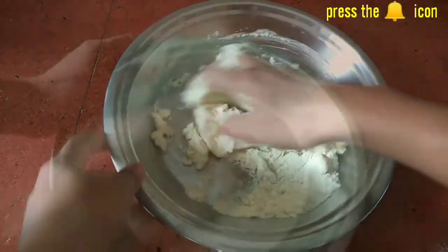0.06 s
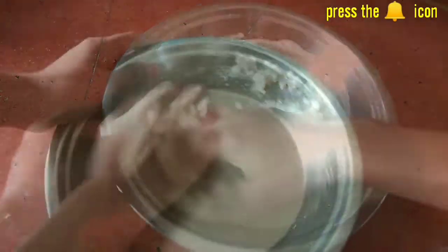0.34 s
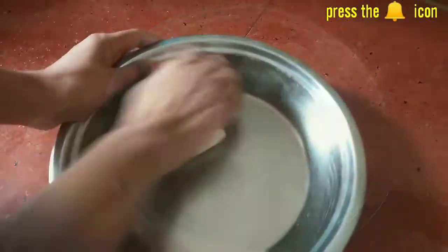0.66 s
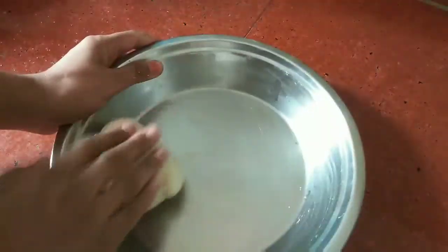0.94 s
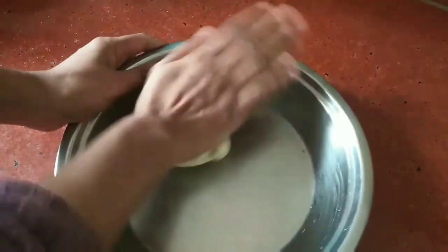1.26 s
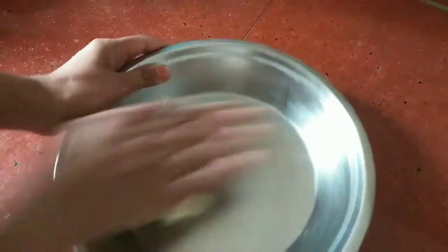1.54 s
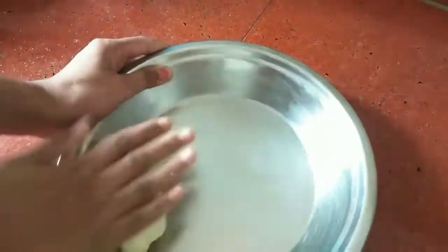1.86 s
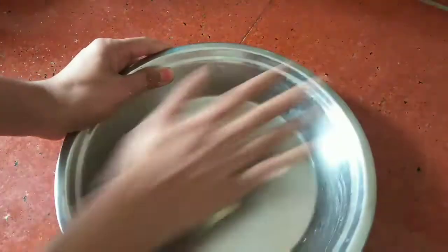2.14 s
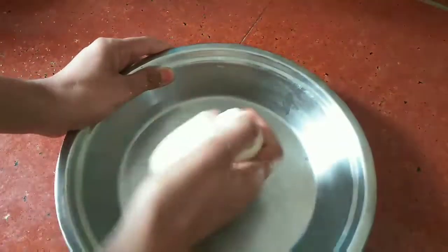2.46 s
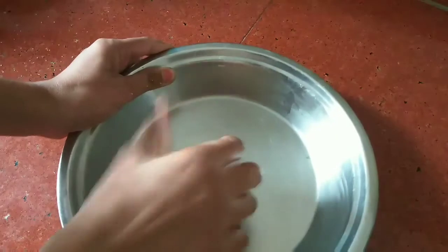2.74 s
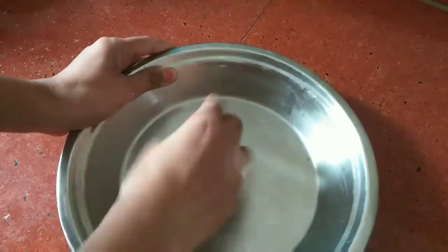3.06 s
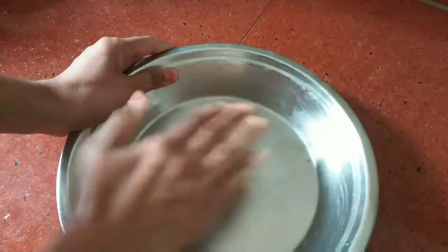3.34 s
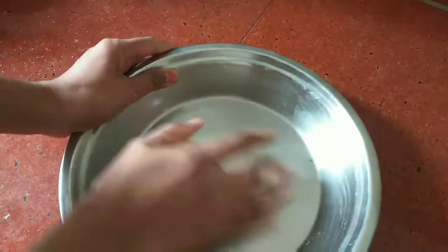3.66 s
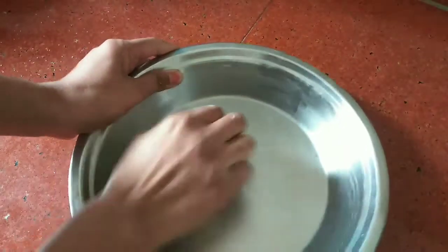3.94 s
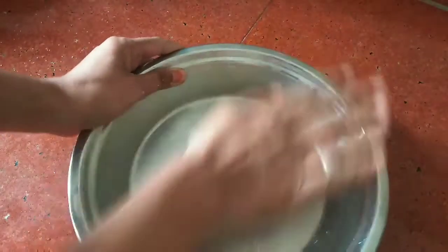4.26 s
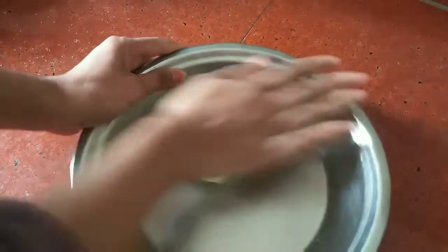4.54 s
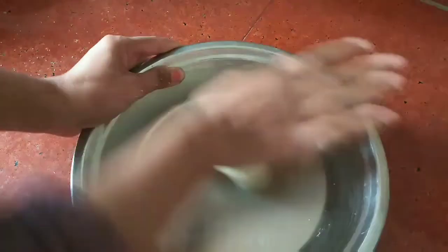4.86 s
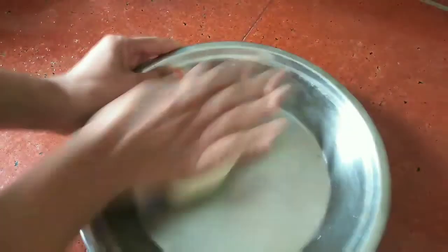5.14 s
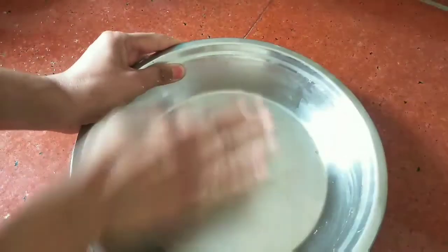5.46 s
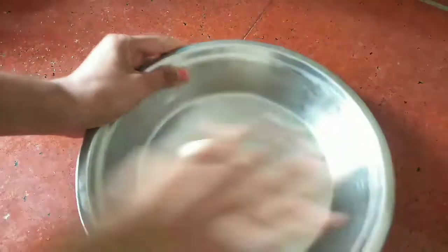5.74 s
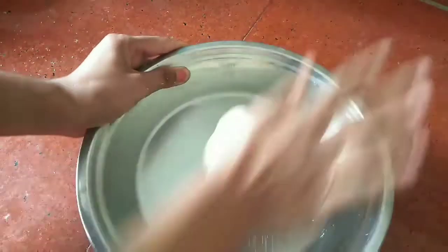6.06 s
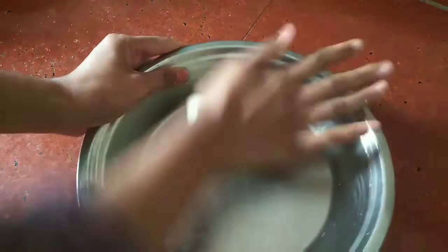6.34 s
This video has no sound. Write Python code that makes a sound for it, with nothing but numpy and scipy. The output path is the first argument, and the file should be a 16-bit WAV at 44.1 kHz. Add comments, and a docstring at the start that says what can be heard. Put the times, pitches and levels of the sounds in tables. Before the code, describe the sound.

Hands push and roll stiff dough around a wide steel bowl on a hard kitchen floor. Soft, uneven thumps and knocks mix with raspy rubbing and tiny sticky snaps, and the held bowl rings briefly on the sharper hits. A faint high squeal sounds early and again near the end. The knocks thin out in the second half while the rubbing strokes continue, heard close in a small bare room with a low hum.

```python
"""Hands push and roll stiff dough around a wide steel bowl on a hard kitchen floor.
The palm thumps and flexes the base, which knocks on the floor. Dough and skin stick and slip over the
metal: rubbing, grit, chirps, tacks. The held bowl rings briefly and a small bare room answers.
A faint high squeal sounds twice; room air and a low hum lie underneath. The level dips once, early on."""
import sys
import numpy as np
from scipy import signal
from scipy.fft import rfft, irfft, next_fast_len
from scipy.io import wavfile
from scipy.ndimage import uniform_filter1d

SR = 44100
rng = np.random.default_rng(int(sys.argv[2]) if len(sys.argv) > 2 else 0)


def file_out(sig):
    """Save sig as 16-bit WAV at sys.argv[1]."""
    # one column per channel
    cols = np.atleast_2d(sig).T
    # limit, then scale
    lim = np.clip(cols, -1, 1)
    pcm = np.round(lim * 32767).astype(np.int16)
    wavfile.write(sys.argv[1], SR, pcm)


N = 281799
TIME_S = np.arange(N) / SR
RING_SAMPLES = 2 ** 15

# blows: t/s, level/dB, arm weight/dB, sharpness/dB, L-R/dB, crush length/ms, lead-in/dB,
# note of the struck patch f/Hz, note re blow/dB, note decay/ms
BLOWS = [(0.397, -52, -17, -15, -0.5, 2, -5.5, 593, 15.5, 1.54),
         (1.166, -51, -12, 2, 0, 5.8, -7, 520, -10, 4.2), (1.182, -54, -10.5, -13, 2, 8.4, -8, 382, 2, 9),
         (1.451, -58, -1, 4, 0.5, 5.2, -1.5, 1217, 18.5, 2.1),
         (1.495, -60, -13, 1, 2, 4.2, 5, 2150, 21, 1.25),
         (1.724, -43, 2, -11, 0, 3.8, -10.5, 264.3, 15.5, 10.4),
         (1.862, -66, -9, -3, -2, 10, 1, 344, 7, 13), (1.98, -62, -1.5, -17, 0, 7, -7, 474, 5, 13),
         (2.114, -60, -31, 3, -4, 3.7, -6, 1870, 9, 4), (2.356, -55, -6.5, 2, 0.5, 4.7, 0, 670, 10.5, 1.8),
         (2.392, -63.5, -12, -14, 0, 3.2, -6, 504, 2, 9.5), (2.452, -65, -25, -2, -1, 3, -5, 830, 4, 6.6),
         (2.605, -38, -16.5, -3, -1.5, 3.5, -11, 1193, 10, 4.4),
         (2.644, -47, -18, -1, -6, 6.7, -9, 303, 4, 8.1), (2.654, -43.5, -18, 7, 1, 3.6, 3, 1315, 2, 12.6),
         (2.676, -48.5, -2.5, -18.5, 0.5, 8.3, -30, 400, 19.5, 2.6),
         (2.709, -49.5, -11.5, -9, 4, 8.1, -7, 292, -2, 5.4), (3.086, -48, -5, -8, -1, 11, -6, 199, 4, 13),
         (3.19, -42, -8, -4, -2, 4.1, -8, 232, -8, 6),
         (3.711, -69, -22.5, 4.5, -2.5, 2.1, -11, 1360, 2.5, 8.3),
         (3.799, -67.5, -8, 3.5, -1, 5, -18, 2030, 11.5, 5),
         (3.842, -47, -30, -3, -0.5, 5.5, -9, 2380, 7, 2.8),
         (3.98, -51, -16.5, -3.5, -1, 12.6, -7, 1182, -2, 18),
         (4.061, -58, -12.5, 4.5, 0.5, 3.3, -5, 2156, 11, 4),
         (4.436, -68, -18, -6, 3, 4, -11, 2290, 7.5, 5.5), (4.485, -72, -13, -5, -3, 5, -6, 470, 9, 8.8),
         (4.555, -64.5, -25, 4, 3, 9.8, -1, 1170, -5, 11), (4.902, -64, -11, 7, 1, 6, 0, 1286, 8, 8.8),
         (5.259, -70, -18, -1, -4, 5, -11, 607, 9.5, 7), (5.324, -70, -23, 15, 5, 4, 7, 3610, 14.5, 6.9),
         (6.306, -66.5, -2, -12, 1, 5.4, -6, 490, 0, 11)]
# boom, thud, body, clank, tick: level/dB, share of weight, share of sharpness
BLOW_BANDS = [(-6, 1.15, 0.64), (-2.5, 0.71, -0.16), (-6, 0.22, -0.45), (-2.4, -0.0098, 0.13),
              (-4.5, 0.13, 0.96)]
BLOW_EDGES_HZ = (105, 180, 460, 900, 2800, 13000)
# contact spectrum: f/Hz, level/dB
CONTACT_EQ = [(60, -6), (140, -13.5), (200, 3.5), (262, 4), (350, 5.5), (620, -2), (850, -2.5), (1230, 2.5),
              (1580, -5.5), (2150, -4.5), (3500, -5), (5800, -3), (8000, -19), (12500, -18)]
# bowl modes: f/Hz, level/dB, T60/s
BOWL_MODES = [(139.8, -5, 0.24), (163.8, -8.5, 0.33), (230.5, -5, 0.45), (267, -5.5, 0.37),
              (339, -2.5, 0.48), (388, -11, 0.49), (447, -14.5, 0.47), (539, -4, 0.52), (609, -2, 0.52),
              (713, -4.5, 0.41), (784, -6, 0.46), (960, -1, 0.52), (1138, -1, 0.26), (1200, -0.5, 0.095),
              (1244, 0, 0.14), (1305, -2.5, 0.22), (1368, -0.5, 0.39), (1686, 2, 0.2), (1790, 2, 0.4),
              (1860, -0.5, 0.2), (2049, -1, 0.2), (2410, -1.5, 0.25), (3090, -6, 0.24), (4190, 7.5, 0.22),
              (4410, 1.5, 0.21), (5120, 3, 0.19)]
# base bulges under the palm: t/s, favoured f/Hz, level/dB, time until damped/s
BULGES = [(0.401, 455, -56.5, 0.16), (1.175, 133, -53, 0.053), (1.49, 200, -60, 0.034),
          (1.723, 140, -34.5, 0.064), (1.726, 490, -41.5, 0.042), (1.821, 145, -39, 0.12),
          (1.916, 267, -50, 0.078), (2.70, 348, -54, 0.095), (3.09, 171, -54.5, 0.093),
          (3.235, 346, -53.5, 0.16), (3.842, 191, -54, 0.037)]
# air puffs: t/s, level/dB, half length/s
PUFFS = [(1.79, -65, .018), (1.828, -55, 0.011), (2.667, -61, 0.0079)]
# wall clang modes: f/Hz, level/dB, T60/s
CLANG_MODES = [(1840, -2, 0.043), (1965, -3, 0.045), (2064, -4, 0.059), (2360, 1, 0.027), (2960, -8, 0.034)]
# knocks that clang: t/s, level/dB
CLANG_JOLTS = [(2.606, -31), (3.191, -42.5)]
# close, beating rim modes: f/Hz, level/dB, T60/s
RIM_MODES = [(2900, -2.5, 0.69), (3360, -2, 0.58), (3440, -2.5, 0.75), (3460, -2, 0.44), (4140, -8, 0.67),
             (4250, -6.5, 0.97), (4190, -2, 0.8), (5440, 1, 0.42), (5599, -6, 0.4), (6460, -3, .35)]
# jolts that ring the rim: t/s, level/dB
RIM_JOLTS = [(2.656, -51.5), (4.064, -70.5), (5.325, -69)]

# strokes: crest t/s, length/s, level/dB, skin dryness/dB, dough stickiness/dB
STROKES = [(0.01, 0.24, -74.5, 11.5, 8), (0.348, 0.21, -80, 24, 9), (1.176, 0.091, -58.5, 2.5, -4),
           (1.37, 1, -75.5, 17, 6.5), (1.719, 0.085, -48.5, -1.5, -4), (1.895, 0.11, -54.5, -4, -5.5),
           (2.024, 0.083, -55, 6.5, -6), (2.124, 0.077, -53.5, -3.5, -2.5), (2.15, 0.027, -59, 6, 6.5),
           (2.247, 0.038, -59, -6, -4), (2.295, 0.062, -57, -1.5, -3), (2.429, 0.086, -62.5, -5.5, -17),
           (2.582, 0.064, -64, 8.5, -10), (2.705, 0.15, -58, 1, -7), (2.852, 0.12, -62, -2.5, -12),
           (3.256, .12, -64, -16, -11), (3.433, 0.076, -69.5, 5.5, 7), (3.601, 0.079, -72, 0, 3.5),
           (3.819, 0.045, -63.5, 4, 3.5), (3.975, 0.1, -61.5, -1, 1), (4.102, 0.083, -65.5, -3, 1),
           (4.33, 0.036, -68.5, 7, 5), (4.426, 0.075, -62.5, -1.5, -10), (4.603, 0.13, -65.5, 3, 3.5),
           (4.78, 0.12, -62.5, 4, -8), (4.906, 0.063, -58, -2.5, 2.5), (4.998, .16, -59.5, 11, -5),
           (5.137, 0.067, -62.5, -4, -4), (5.258, 0.077, -59, -1.5, 0), (5.32, 0.046, -63, 0, 3.5),
           (5.47, 0.089, -63, -1.5, -5), (5.649, 0.11, -62, -1, -0.5), (5.784, 0.04, -68.5, -3, -10),
           (5.87, 0.093, -61.5, 3.5, -2.5), (5.98, .1, -58.5, -2, 3.5), (6.217, 0.15, -62.5, -6.5, -8),
           (6.355, 0.23, -62.5, 0, -1)]
# drag, scrape, hiss, crackle: level/dB, share of dryness, share of stickiness
STROKE_BANDS = [(-11.5, -0.033, 0), (-4, -0.7, 0), (-4, 0.43, 0), (-7.5, 0.032, 0.99)]
STROKE_EDGES_HZ = (220, 900, 2500, 7000, 13000)
# light rubbing between strokes: t/s, level/dB
TOUCH = [(0, -90), (.85, -79), (.88, -76), (2.3, -68), (3.0, -99), (3.85, -94), (4.2, -71), (6.39, -72)]
# sliding contact spectrum: f/Hz, level/dB
RUB_EQ = [(200, -11), (450, -7), (800, -3), (1020, -3.5), (1290, -2.5), (1530, -8), (2050, -2.5),
          (2900, -4), (4400, -2), (6300, -6), (8000, -20), (13000, -13)]
# rubbed wall resonances: f/Hz, width/Hz, level re plain rubbing/dB
WALL_PEAKS = [(1203, 64, 2), (1326, 60, 6), (1660, 70, -4.5), (2064, 64, -6.5), (2650, 27, -8.5),
              (3200, 150, -13), (3610, 78, -6.5), (4500, 390, -6.5)]
# skin catching on steel, and sticky dough letting go with a tiny chirp: t/s, f/Hz, relative level/dB, half
# length/ms
CATCHES = [(1.137, 1380, -61, 7), (1.455, 4800, -59, 4.3), (1.475, 1330, -55, 3.9),
           (1.502, 1750, -53.5, 4.6), (1.986, 3950, -46, 1.9), (2.014, 4200, -46, 2.5),
           (2.09, 1150, -49.5, 2.7), (2.091, 5400, -58, 2), (2.117, 1335, -41.5, 3.4),
           (2.228, 1400, -60, 2), (2.257, 2100, -56, 4), (2.353, 2400, -45.5, 1.3), (2.358, 5650, -53, 1.3),
           (2.393, 1200, -48.5, 1.7), (3.421, 4600, -57.5, 7), (3.844, 3400, -46, 1.9),
           (3.918, 6500, -61.5, 4.4), (3.988, 4550, -53, 3), (4.066, 2170, -51, 3), (4.066, 3400, -48, 2.8),
           (4.32, 4870, -66, 4.4), (4.39, 3550, -67, 3.3), (4.559, 1730, -51.5, 3.2),
           (4.571, 900, -56.5, 4), (4.61, 1150, -56.5, 3.8), (4.76, 5600, -61, 4.4),
           (4.803, 4100, -67, 2.8), (4.811, 1300, -57, 6.9), (5.136, 3140, -60, 4.8),
           (5.246, 1180, -55.5, 7.7), (5.327, 3530, -52, 4), (5.326, 4410, -56, 6), (5.327, 2400, -59, 5.1),
           (5.476, 1200, -58.5, 5.4), (5.5, 3000, -64, 3), (5.622, 1120, -60, 6.6),
           (5.658, 1894, -56.5, 2.7), (5.69, 6700, -59, 4.1), (5.958, 1300, -56, 7), (6.19, 1200, -57, 4.6),
           (6.366, 1150, -58, 3.5)]
# dough letting go: t/s, level/dB
TACKS = [(1.169, -47), (2.359, -51), (3.844, -55), (4.063, -48), (4.068, -53), (5.325, -55)]
# the wall throws the treble left: f/Hz, L-R/dB
TREBLE_PAN = [(300, -2), (1200, -0.5), (2200, 1), (4000, -2), (7000, 6), (13000, 5)]

# squeal envelope: t/s, main tone/dB, lower tone/dB
SQUEAL_LEVELS = [(.89, -92, -97), (.96, -70, -73), (1.0, -59, -77), (1.04, -60.5, -77), (1.08, -72.5, -80),
                 (1.12, -68, -74), (1.22, -65, -76), (1.34, -66.5, -77), (1.42, -77, -91),
                 (1.48, -96, -100), (1.6, -120, -120), (5.15, -120, -120), (5.3, -75, -88),
                 (5.58, -76.5, -90), (5.72, -76, -95), (5.9, -110, -120)]
# squeal tones: f/Hz, fractional rise
SQUEAL_TONES = [(3680, 0.012), (3290, .002)]
# room decay: f/Hz, T60/s
ROOM_T60 = [(100, 0.9), (260, 0.49), (700, 0.62), (1800, 0.47), (4800, 0.35), (12000, 0.28)]
# diffuse field: f/Hz, L-R correlation
COHERENCE = [(60, 0.94), (140, 0.86), (280, 0.59), (550, 0.32), (1200, -0.14), (2500, -0.29),
             (12000, -0.078)]
# room air spectrum: f/Hz, relative level/dB
AIR_EQ = [(25, -32), (60, -19.5), (115, -14.5), (280, -17), (550, -17), (900, -22.5), (1300, -24.5),
          (1650, -23), (2200, -23.5), (6500, -30), (8000, -36), (13000, -32)]
# room hum: t/s, level/dB
HUM_LEVEL = [(0, -87), (.12, -69), (.22, -79), (.5, -85), (.89, -71.5), (3.6, -81), (6.39, -79)]
# overall gain on all layers, with one brief dip: t/s, gain/dB
MASTER_GAIN = [(.54, 3.5), (.62, -9), (.7, -18), (.858, -26), (.874, 6)]


def blows(crush_db=3, crackle_db=9, lead_in_s=0.0084, knock_db=7, knock_slope=0.17, medium_db=-46):
    """The blow lands and small contacts crush after it; weight and sharpness tilt the bands."""
    out = np.zeros((2, N + RING_SAMPLES))
    lead = int(.02 * SR)
    attack = slice(lead, lead + int(.03 * SR))
    t = TIME_S[:RING_SAMPLES] - lead / SR
    for at_s, level_db, weight_db, sharp_db, pan_db, crush_ms, lead_in_db, *_ in BLOWS:
        age = 2000 * np.maximum(t, 0) / crush_ms
        crackle = rng.standard_normal(RING_SAMPLES) * undb(crackle_db * rng.standard_normal(RING_SAMPLES))
        # a short noise swell just before the blow softens its attack
        lead_in = undb(lead_in_db) * unit(crackle * np.exp(-np.abs(t) / lead_in_s) * (t < 0))
        crush = undb(crush_db) * unit(crackle * age * np.exp(-age))
        drive = (crush + lead_in) / np.sqrt(RING_SAMPLES)
        drive[lead] += 1
        sound = convolve(drive, bowl_in_room(ring_db=-1, early_db=14, room_db=7, early_s=0.017))
        # base hits the floor 2 ms later, more sharply under a hard blow
        sound[:, lead + int(.002 * SR)] += undb(knock_db + knock_slope * (level_db - medium_db))
        sound = colour(sound, CONTACT_EQ)
        start = int(at_s * SR) - lead
        for lo_hz, hi_hz, (db, heavy, sharp) in zip(BLOW_EDGES_HZ, BLOW_EDGES_HZ[1:], BLOW_BANDS):
            part = band(sound, lo_hz, hi_hz)
            gain = undb(level_db + db + heavy * weight_db + sharp * sharp_db) / part[:, attack].std()
            out[:, start:start + RING_SAMPLES] += pan(pan_db) * gain * part
    return out[:, :N]


def patch_notes(rise_s=0.0015, delay_s=0.001003, sag=0.036):
    """The struck patch of steel gives a short sagging note, choked by the dough."""
    out, t = np.zeros((2, N + RING_SAMPLES)), TIME_S[:RING_SAMPLES]
    for at_s, level_db, _, _, pan_db, _, _, hz, note_db, decay_ms in BLOWS:
        fade = np.exp(-1000 * t / decay_ms)
        pitch_hz = hz * (1 + sag * (fade - .5))
        note = np.sqrt(2) * fade * (1 - np.exp(-t / rise_s)) * sine(pitch_hz)
        start = int((at_s + delay_s) * SR)
        out[:, start:start + RING_SAMPLES] += pan(pan_db) * undb(level_db + note_db) * note
    return convolve(out[:, :N], bowl_in_room(ring_db=-39, early_db=-7, room_db=-6))


def base_flex(push_s=0.01, damp_s=0.02, spread_oct=0.3, waver=0.026, mode_count=8):
    """The bulging base swings in the lowest modes, detuned and then stopped by the hand."""
    out, t = np.zeros(N + RING_SAMPLES), TIME_S[:RING_SAMPLES]
    hz, db, t60_s = np.transpose(BOWL_MODES[:mode_count])[:, :, None]
    tuning = 1 + waver * np.array([walk(70) for _ in hz])
    for at_s, favoured_hz, level_db, free_s in BULGES:
        start = int(at_s * SR)
        span = slice(start, start + RING_SAMPLES)
        sizes = undb(db) * np.exp(-(np.log2(hz / favoured_hz) / spread_oct) ** 2)
        modes = sizes * sine(hz * tuning[:, span]) * decay(t, t60_s)
        swing = np.sum(modes, axis=0) / np.linalg.norm(sizes)
        out[span] += undb(level_db) * swing * held(t, push_s, free_s, damp_s)
    return np.sqrt(2) * out[:N]


def puffs(band_hz=(68, 115)):
    """Low gusts of air squeezed from under bowl and dough."""
    air = band(diffuse(N), *band_hz)
    envelope = sum(undb(db) * np.exp(-((TIME_S - at_s) / half_s) ** 2) for at_s, db, half_s in PUFFS)
    return envelope * air / running_rms(air, 1024)


def steel_ring(modes, jolts, rise_s, free_s, damp_s=.03):
    """A jolt rings a group of modes until they fade or the hand stops them."""
    out, t = np.zeros((2, N + RING_SAMPLES)), TIME_S[:RING_SAMPLES]
    hz, db, t60_s = np.transpose(modes)[:, :, None, None]
    envelope = np.sqrt(2) * held(t, rise_s, free_s, damp_s) / np.linalg.norm(undb(db))
    for at_s, level_db in jolts:
        phase = 2 * np.pi * rng.random((len(modes), 2, 1))
        ring = np.sum(undb(db) * np.sin(2 * np.pi * hz * t + phase) * decay(t, t60_s), axis=0)
        start = int(at_s * SR)
        out[:, start:start + RING_SAMPLES] += undb(level_db) * envelope * ring
    return out[:, :N]


def rubbing():
    """Slips swell with each stroke; dryness and stickiness weight the bands."""
    sound, out = slips(), 0
    for lo_hz, hi_hz, (db, dry_share, sticky_share) in zip(
            STROKE_EDGES_HZ, STROKE_EDGES_HZ[1:], STROKE_BANDS):
        part = band(sound, lo_hz, hi_hz)
        out += undb(db) * effort(dry_share, sticky_share) * part / running_rms(part, 4096)
    return out


def effort(dry_share, sticky_share, touch_dry_db=-3, touch_sticky_db=4, rise_share=0.47):
    """Rubbing amplitude: each stroke swells and eases over the resting touch."""
    power = undb(curve(TOUCH)[0] + dry_share * touch_dry_db + sticky_share * touch_sticky_db) ** 2
    for at_s, length_s, db, dry_db, sticky_db in STROKES:
        near = slice(*np.searchsorted(TIME_S, [at_s - 2 * length_s, at_s + 2 * length_s]))
        t = TIME_S[near] - at_s
        width_s = length_s * np.where(t < 0, rise_share, 1 - rise_share)
        swell = np.exp(-(t / width_s) ** 2)
        power[near] += undb(db + dry_share * dry_db + sticky_share * sticky_db) ** 2 * swell
    return np.sqrt(power)


def slips(rate_hz=1100, scatter_db=3.5, judder_db=1, shift_db=6, places=6):
    """Dough sticks and slips in tiny grains; the hand drifts between places, each with its own ring."""
    weights = undb(shift_db * np.array([walk(14) for _ in range(places)]))
    weights /= np.sqrt(np.sum(weights ** 2, axis=0))
    judder, out = undb(judder_db * walk(50)), 0
    for weight in weights:
        sizes = undb(scatter_db * np.minimum(rng.exponential(size=N), 4))
        grains = (rng.random(N) < rate_hz / SR) * rng.standard_normal(N) * sizes
        place = bowl_in_room(ring_db=-10.5, early_db=11.5, room_db=3.5, early_s=0.013, place_db=5)
        out += convolve(grains * weight * judder, place)
    return wall_ring(mottle(colour(out, RUB_EQ)))


def mottle(x, depth_db=4.5, patch_s=.045, patch_hz=150, smooth_above_hz=5500):
    """Narrow bands swell and fade at random: a patchy metallic rasp, smoother on top."""
    size, hop = 1024, 256
    hz, _, spectra = signal.stft(x, fs=SR, nperseg=size, noverlap=size - hop)
    drift = rng.standard_normal(spectra.shape[1:])
    for axis, span in enumerate([patch_hz * size / SR, patch_s * SR / hop]):
        for _ in range(2):
            drift = uniform_filter1d(drift, int(span), axis=axis)
    gain_db = depth_db * unit(drift) / np.hypot(1, (hz[:, None] / smooth_above_hz) ** 2)
    return signal.istft(spectra * undb(gain_db), nperseg=size, noverlap=size - hop)[1][:, :N]


def wall_ring(x):
    """Sliding contact keeps the wall's narrow resonances sounding."""
    return x + sum(undb(db) * signal.lfilter(*signal.iirpeak(hz, hz / width_hz, fs=SR), x)
                   for hz, width_hz, db in WALL_PEAKS)


def grit(rate_hz=110, lo_hz=1600, hi_hz=6800, gain_db=-7.5, scatter_db=2, decay_s=0.00076):
    """Specks of dough tear loose at random, each with a tiny ring at its own pitch."""
    out, t = np.zeros(N + RING_SAMPLES), TIME_S[:1024]
    strength = effort(dry_share=0.15, sticky_share=0.13)
    envelope = np.e * t / decay_s * np.exp(-t / decay_s)
    for when, height, luck in rng.random((int(rate_hz * N / SR), 3)):
        start = int(when * N)
        size = strength[start] * undb(gain_db + scatter_db * min(-np.log(1 - luck), 3))
        hz = lo_hz * (hi_hz / lo_hz) ** height
        out[start:start + len(t)] += size * envelope * np.sin(2 * np.pi * hz * t)
    return wall_ring(convolve(out[:N], bowl_in_room(ring_db=-24, early_db=1.5, room_db=-4.5)))


def catches(gain_db=-8, waver=0.025, soft_hz=1260, spread_hz=64, soft_db=-9, soft_ms=6.4, jitter_s=0.0081):
    """Stick-slip chirps: sharp catches of skin and sticky dough letting go, plus a soft one near each stroke's
    crest."""
    chance = rng.standard_normal((len(STROKES), 2))
    dry_share = STROKE_BANDS[1][1]  # scrape band
    soft = [(at_s + jitter_s * late, soft_hz + spread_hz * high, db + soft_db + dry_share * dry_db, soft_ms)
            for (at_s, _, db, dry_db, _), (late, high) in zip(STROKES, chance)]
    out, t = np.zeros(N + RING_SAMPLES), TIME_S[:4096] - .045
    for at_s, hz, db, half_ms in soft + CATCHES:
        wobble = unit(uniform_filter1d(rng.standard_normal(len(t)), size=48))
        envelope = np.sqrt(2) * undb(db) * np.exp(-(1000 * t / half_ms) ** 2 / 2)
        start = max(int((at_s + t[0]) * SR), 0)
        out[start:start + len(t)] += envelope * sine(hz * (1 + waver * wobble))
    return undb(gain_db) * convolve(out[:N], bowl_in_room(ring_db=-46, early_db=-5.5, room_db=-12.5))


def tacks(band_hz=(1500, 8000), decay_s=0.0018):
    """Dough lets go of the steel with a crisp snap."""
    impulses = np.zeros(N)
    for at_s, db in TACKS:
        impulses[int(at_s * SR)] += undb(db)
    envelope = signal.lfilter([1], [1, -np.exp(-1 / (decay_s * SR))], impulses + 1e-18)
    snaps = envelope * unit(band(diffuse(N), *band_hz, order=2))
    return convolve(snaps, bowl_in_room(ring_db=-16, early_db=-12, room_db=-16))


def bowl_in_room(ring_db, early_db, room_db, early_s=0.03, build_s=0.00069, place_db=2):
    """Tap response at one place: click, bowl modes, wall and floor reflections, room tail."""
    t = TIME_S[:RING_SAMPLES]
    ring = 0
    for hz, db, t60_s in BOWL_MODES:
        # L-R phase difference grows with frequency
        phase = 0.77 * min(hz / 1100, 2) * rng.standard_normal((2, 1))
        size = undb(db + place_db * rng.standard_normal())
        ring += size * np.cos(2 * np.pi * hz * t + phase) * decay(t, t60_s)
    early = diffuse(RING_SAMPLES) * np.exp(-t / early_s)
    noise, tail = diffuse(RING_SAMPLES), 0
    edges_hz = np.geomspace(60, 15360, 7)
    for lo_hz, hi_hz in zip(edges_hz, edges_hz[1:]):
        tail += band(noise, lo_hz, hi_hz, order=2) * decay(t, at_hz(ROOM_T60, np.sqrt(lo_hz * hi_hz)))
    tail *= 1 - np.exp(-t / build_s)
    out = undb(ring_db) * unit(ring) + undb(early_db) * unit(early) + undb(room_db) * unit(tail)
    out /= np.sqrt(RING_SAMPLES)
    out[:, 0] += 1
    return out


def squeal(break_s=1.02, turn_s=0.077, clean_waver=0.004, rough_waver=0.013, trill_hz=62.9, depth=0.93):
    """Two thin high tones start clean, rise into a rough trill, and return faintly later."""
    rough = np.clip((TIME_S - break_s) / turn_s, 0, 1)
    waver = clean_waver + rough * (rough_waver - clean_waver)
    trill = 1 + depth * rough * sine(trill_hz * (1 + .08 * walk(12)))
    out = 0
    for (hz, rise), waver_share, db in zip(SQUEAL_TONES, (1, 0.58), curve(SQUEAL_LEVELS)):
        wobble = waver_share * waver * (walk(220) + 0.446 * walk(35))
        tone = trill * sine(hz * (1 + rise * rough + wobble))
        out += undb(db) * unit(convolve(tone, bowl_in_room(ring_db=-30, early_db=3, room_db=1.5)))
    return out


def background(air_db=-75, hum_hz=(92, 134)):
    """Soft room air and a low, unsteady hum."""
    air = undb(air_db) * unit(colour(diffuse(N), AIR_EQ))
    hum = undb(curve(HUM_LEVEL)[0]) * unit(band(diffuse(N), *hum_hz, order=2))
    return air + hum


def diffuse(count):
    """Stereo noise: alike in the bass, nearly unrelated in the treble."""
    mid, side = rfft(rng.standard_normal((2, count)))
    alike = at_hz(COHERENCE, np.fft.rfftfreq(count, 1 / SR))
    mid, side = mid * np.sqrt(1 + alike), side * np.sqrt(1 - alike)
    return unit(irfft(np.array([mid + side, mid - side]), count))


def walk(rate_hz):
    """Smooth random drift, rms 1."""
    hold = int(SR / rate_hz)
    steps = np.repeat(rng.standard_normal(N // hold + 1), hold)
    return unit(uniform_filter1d(uniform_filter1d(steps, hold), hold)[:N])


def held(t, rise_s, free_s, damp_s):
    """Envelope: rise, ring free, damp."""
    return (1 - np.exp(-t / rise_s)) * np.exp(-np.maximum(t - free_s, 0) / damp_s)


def decay(t, t60_s):
    """Fall of 60 dB per T60."""
    return np.exp(-np.log(1000) * t / t60_s)


def sine(hz):
    """Sine from per-sample frequency."""
    return np.sin(2 * np.pi * np.cumsum(hz, axis=-1) / SR)


def undb(db):
    """dB to gain."""
    return 10 ** (np.asarray(db) / 20)


def pan(db):
    """Channel gains for an L-R level."""
    return undb(np.array([[.5], [-.5]]) * db)


def unit(x):
    """Scale to rms 1."""
    return x / np.sqrt(np.mean(x ** 2) + 1e-30)


def running_rms(x, samples):
    """Sliding rms over both channels."""
    return np.sqrt(uniform_filter1d(np.mean(x ** 2, axis=0), size=samples))


def curve(table):
    """Columns of a time table, per sample."""
    times_s, *columns = np.transpose(table)
    return [np.interp(TIME_S, times_s, column) for column in columns]


def at_hz(table, hz):
    """Interpolate on a log-frequency axis."""
    points_hz, values = np.transpose(table)
    return np.interp(np.log(np.maximum(hz, 1)), np.log(points_hz), values)


def colour(x, table, size=2048):
    """Minimum-phase filter from f/Hz, level/dB points."""
    gain = undb(at_hz(table, np.fft.rfftfreq(size, 1 / SR)))
    cepstrum = irfft(np.log(gain))
    cepstrum[1:size // 2] *= 2
    cepstrum[size // 2 + 1:] = 0
    return convolve(x, irfft(np.exp(rfft(cepstrum))))


def convolve(x, response):
    """Convolve, keeping the length."""
    return signal.fftconvolve(np.atleast_2d(x), np.atleast_2d(response), axes=-1)[:, :x.shape[-1]]


def band(x, lo_hz, hi_hz, order=3):
    """Band-pass."""
    return signal.sosfilt(signal.butter(order, [lo_hz, hi_hz], "band", fs=SR, output="sos"), x)


def scene():
    """Bowl sources panned by frequency, plus squeal and background, under the overall gain."""
    bowl = blows()
    bowl += band(patch_notes() + base_flex(), 106, 12060, order=2)  # notes and flex kept out of the deep bass
    bowl += puffs() + rubbing() + grit() + catches() + tacks()
    bowl += steel_ring(CLANG_MODES, CLANG_JOLTS, rise_s=.0008, free_s=.1)
    bowl += steel_ring(RIM_MODES, RIM_JOLTS, rise_s=.0043, free_s=.33)
    size = next_fast_len(N + 2048, True) // 2 * 2
    pan_db = at_hz(TREBLE_PAN, np.fft.rfftfreq(size, 1 / SR))
    placed = irfft(rfft(bowl, size) * pan(pan_db))[:, :N]
    return (placed + squeal() + background()) * undb(curve(MASTER_GAIN)[0])


def record(dry):
    """Steep low-pass at 13.2 kHz."""
    return signal.sosfilt(signal.ellip(10, .2, 70, 13200, fs=SR, output="sos"), dry)


dry = scene()
out = record(dry)
file_out(out)
```